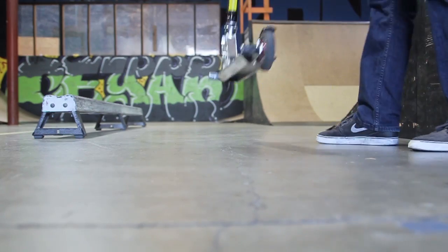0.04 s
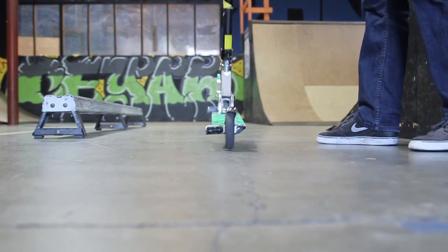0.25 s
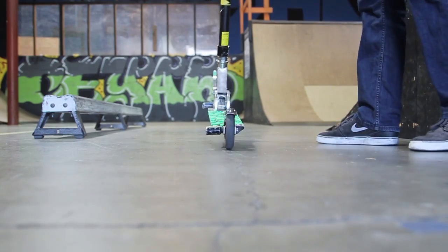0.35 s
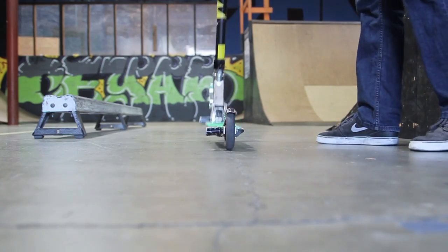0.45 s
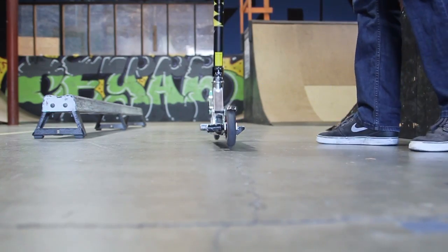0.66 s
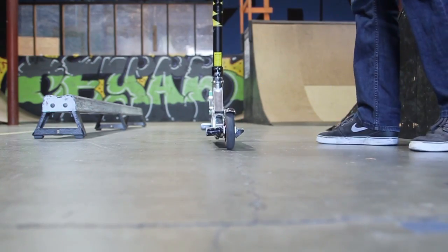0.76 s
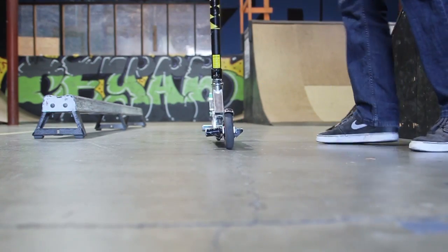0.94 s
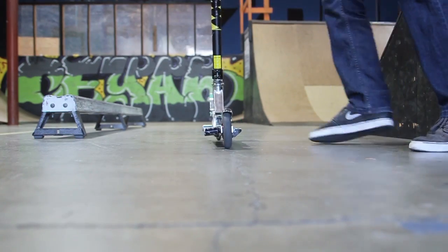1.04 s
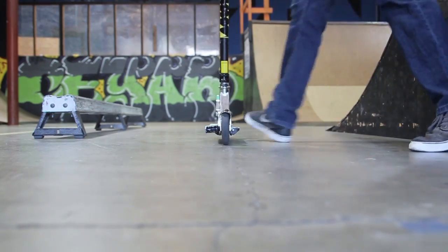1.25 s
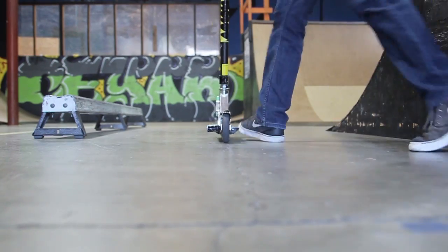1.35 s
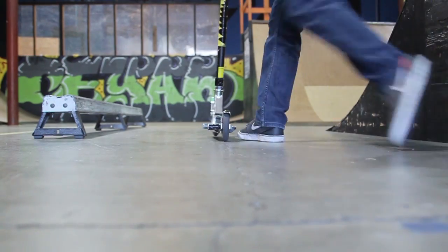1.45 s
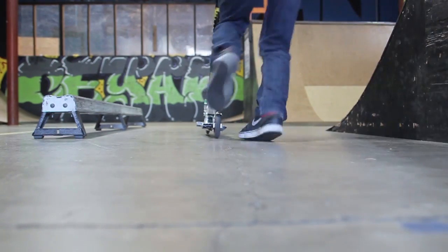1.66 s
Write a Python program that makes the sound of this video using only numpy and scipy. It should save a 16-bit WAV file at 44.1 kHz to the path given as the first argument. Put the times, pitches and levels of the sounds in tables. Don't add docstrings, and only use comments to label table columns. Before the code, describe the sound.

After a faint click, a scooter smacks the floor, its loose metal parts rattling and hollow deck knocking over repeated bounces, then soft grainy wheel roll and small clicks; captured close in a reverberant skate hall.

```python
import sys
import numpy as np
from scipy import signal
from scipy.fft import rfft, irfft
from scipy.io import wavfile
from scipy.ndimage import uniform_filter1d

SR = 44100
rng = np.random.default_rng(int(sys.argv[2]) if len(sys.argv) > 2 else 0)


def amplitude_ratio(level_db):
    exponent = np.asarray(level_db, float) / 20
    return 10 ** exponent


def log_audio(samples):
    frames = np.atleast_2d(samples).T
    limited = np.clip(frames, -1, 1)
    pcm = np.round(limited * 32767).astype(np.int16)
    wavfile.write(sys.argv[1], SR, pcm)


N = 74970

# (time [s], level [dB], length [s], treble [dB])
RATTLES = [(.241, 7, 0.028, 2.5), (0.268, -5.5, 0.04, -3), (0.333, -4.5, 0.023, 13),
           (.552, -1, 0.0096, 0.5), (0.569, -18, 0.015, -4), (0.71, -5, 0.0065, 2), (.726, -14, 0.012, -6),
           (0.75, -6.5, .004, 2), (0.754, -0.5, 0.022, -0.5), (0.822, -21.5, 0.027, -8),
           (0.85, -12.5, 0.0091, -3), (0.909, -6.5, 0.013, 0), (0.963, -16.5, 0.0029, -4),
           (1, -19, 0.012, 3), (1.019, -11, 0.0065, -5), (1.045, -11.5, 0.0059, -3.5),
           (1.083, -29, 0.0059, -24.5), (1.247, -26, 0.0048, -4), (1.263, -36, 0.0067, -15),
           (1.3108, -17.5, 0.0044, -8), (1.317, -17.5, 0.005, -15), (1.326, -18, 0.0092, -7),
           (1.365, -25, 0.0086, -10), (1.49, -29, 0.01, -14), (1.497, -25, 0.006, -15),
           (1.523, -31, 0.022, -7), (1.547, -24.5, 0.0046, -7), (1.5716, -18, 0.0028, -3),
           (1.578, -23, 0.034, -9), (1.6162, -16, 0.0084, -1.5), (1.631, -25.5, 0.023, -16),
           (1.674, -23, 0.021, -10)]
# (frequency [Hz], level [dB])
METAL_MODES = [(545, -54), (1000, -8.5), (1250, 5), (1570, 9.5), (2100, -24), (2690, 2), (3150, 3),
               (3650, 6.5), (4000, 0.5), (4600, 5.5), (5500, -11), (6850, -35), (9000, 0), (14000, 9.5)]
# (time [s], level [dB], pitch [Hz], length [s])
CLANKS = [(.0715, -44, 2400, 0.00088), (0.252, -2.5, 3740, 0.0098), (0.338, -11, 2550, 0.011),
          (0.552, -7.5, 2200, 0.003), (0.577, -13.5, 3900, 0.016), (0.727, -17.5, 2920, 0.0041),
          (0.749, -8, 4650, 0.0091), (0.761, -10.5, 2690, 0.0098), (0.767, -10, 3830, 0.0075),
          (0.829, -16, 2570, 0.0085), (0.912, -16, 2670, 0.013), (0.964, -29, 2650, 0.0083),
          (0.998, -14.5, 3600, 0.0059), (1.02, -19, 2560, 0.0042), (1.046, -24, 3720, 0.007),
          (1.06, -28, 3780, 0.0101), (1.245, -27.5, 3800, 0.005), (1.306, -21.5, 3900, 0.0079),
          (1.334, -28.5, 3130, 0.014), (1.365, -21.5, 2880, 0.011), (1.495, -26, 3750, 0.013),
          (1.525, -27, 3830, 0.0043), (1.543, -25.5, 2340, 0.0071), (1.573, -22, 3220, .003),
          (1.587, -24, 2530, 0.0051), (1.616, -23, 3800, 0.016), (1.678, -27, 3400, .012)]
# (time [s], level [dB], pitch [Hz], ring [s])
TICKS = [(.0135, -25, 980, 0.0079), (.0135, -27, 2200, 0.0016), (.0135, -40, 4200, .001),
         (.017, -28, 1100, .004), (.255, -6, 3580, .012), (.259, -5, 2670, .01), (.264, -9, 3550, 0.011),
         (.341, -2.5, 2550, .016), (.763, -5.5, 2617, .02), (.89, -20, 9500, .006),
         (.554, -7.5, 2120, 0.0098), (.9145, -7.5, 2900, 0.0072), (.9145, -8.5, 1550, 0.0096),
         (.188, -52, 6000, .002), (.405, -8.5, 9000, 0.0058), (.998, -12, 13000, 0.0051),
         (1.002, -9, 5500, 0.0038), (1.0197, -9, 1540, .006), (1.021, -11, 9000, .004),
         (1.022, -18, 14800, .008), (1.035, -21, 9000, 0.012), (1.0445, -8.5, 3660, 0.03),
         (1.048, -18, 12300, .005), (1.0835, -21, 14000, .005), (1.2468, -29, 9000, 0.0056),
         (1.272, -30, 12000, .005), (1.3096, -11.5, 13000, .005), (1.3181, -22, 9000, .004),
         (1.329, -13, 13100, 0.0027), (1.4388, -35, 1500, .004), (1.4678, -26, 1540, 0.0046),
         (1.4912, -32, 9000, .004), (1.4995, -33, 9000, 0.0061), (1.5231, -25, 9000, .006),
         (1.5475, -21, 2320, .006), (1.549, -30, 14000, .006), (1.5725, -34, 3190, .004),
         (1.5728, -23, 13800, 0.0034), (1.581, -22, 8700, .004), (1.591, -26, 14000, .006),
         (1.592, -26, 9500, .004), (1.607, -30, 8800, .003), (1.6154, -12, 9300, .005),
         (1.62, -25, 3860, .008), (1.621, -29, 14500, 0.0052), (1.6758, -25, 8700, .004)]
# (time [s], level [dB], pitch [Hz])
THUMPS = [(.2385, 2, 113.2), (.265, -9.5, 108), (.305, -11, 110), (.345, -12.5, 105), (.438, -20, 163),
          (.55, -4, 110), (.5705, -14, 121), (.704, -8, 118), (.752, -13.5, 120.5), (.831, -12, 104),
          (.855, -18.5, 108), (.906, -20.5, 135), (1.03, -20, 110), (1.2435, -24.5, 100), (1.258, -24, 100),
          (1.307, -22.5, 105), (1.357, -25.5, 93), (1.54, -24, 116), (1.318, -25, 108)]
# (time [s], level [dB], pitch [Hz])
DECK_RINGS = [(.279, -4, 994), (.289, -1.5, 1034), (.308, -10, 1510), (.554, -10.5, 1125),
              (.5875, -5.5, 1050), (.757, -15, 1143), (.77, -6.5, 1150), (.785, -10, 1057), (.79, -8, 1120),
              (.8, -10.5, 1330), (.803, -9, 1090), (.833, -13, 1120), (.914, -30, 1190), (.948, -17, 1050),
              (.968, -17, 1090), (1.02, -24, 1135), (1.054, -15, 1080), (1.077, -13.5, 1274),
              (1.31, -21.5, 1188), (1.342, -23, 1130), (1.363, -16.5, 1103), (1.398, -24, 1000),
              (1.432, -30, 1100), (1.466, -26, 996), (1.547, -24, 1200), (1.685, -23, 1260)]
# (time [s], level [dB], pitch [Hz])
DECK_FLEXES = [
    (.243, -20.5, 394),
    (.338, -21.5, 541),
    (.552, -21, 565),
    (.726, -22, 526),
    (.758, -20.5, 517),
    (.91, -38, 550),
    (1.015, -29.5, 568),
    (1.044, -27.5, 560),
    (1.312, -31, 556),
]
# (time [s], level [dB])
ROLL_LEVEL = [
    (0.949, -50),
    (1.1, -37),
    (1.22, -39),
    (1.33, -32),
    (1.47, -33.5),
    (1.56, -38.5),
    (1.7, -30.5),
]
# (frequency [Hz], tail level [dB], t60 [s])
HALL_TAIL = [(55, -5.5, 0.67), (110, -25.5, 1.94), (170, -10.5, 0.79), (293, -11, 1.8), (680, -16.5, 1.87),
             (920, -9.5, 1.38), (1150, -5.5, 1.21), (1500, -7.5, 1.13), (1900, -15, 1.84),
             (2900, -15, 1.11), (5070, -13, 1.18), (8300, -17.5, 0.99), (14700, -10.5, 0.27)]
# (frequency [Hz], level [dB])
AIR_SPECTRUM = [(25, -17), (60, -6.5), (110, -8), (190, -14.5), (330, -22), (900, -32), (3000, -43.5),
                (11800, -50)]
# (frequency [Hz], gain [dB])
MIC_COLOUR = [(200, 1.03), (280, -3.5), (450, 1.23), (7000, -2.5), (9300, -2.5), (11800, -5), (13800, -2.7),
              (15600, -1)]


def table(rows, hz, column):
    rows = np.array(rows)
    return np.interp(np.log(np.maximum(hz, 1)), np.log(rows[:, 0]), rows[:, column])


def unit(x):
    return x / np.sqrt(np.sum(x ** 4) / np.sum(x ** 2))


def add(out, s, x):
    i = int(s * SR)
    out[i:i + len(x)] += x[:N - i]


def filtered(x, order, hz, kind):
    return signal.lfilter(*signal.butter(order, hz, kind, fs=SR), x)


def rattles():
    rise_s, fall_s, sag_db = 0.00084, 0.0045, -4
    clicks_per_s, click_spread_db = 3000, 2.8
    ring_cycles, detune, mode_spread_db = 70, 0.035, 2.5
    crack_db, crack_hz, sizzle_hz, sizzle_db = 5.5, 1030, 4700, -5.5
    out, t = np.zeros(N), np.arange(SR // 12) / SR
    short = t[:SR // 25]
    hz, db = np.repeat(METAL_MODES, repeats=4, axis=0).T[:, :, None]
    t60 = np.minimum(ring_cycles / hz, 0.04)
    fade = np.exp(-np.log(1000) * short / t60) / np.sqrt(t60)
    for s, level_db, length, treble_db in RATTLES:
        chance, noise = rng.random((2, len(t))), rng.standard_normal(len(t))
        tune, gain = rng.standard_normal((2, len(hz), 1))
        shape = np.clip(t / rise_s, 0, 1) * amplitude_ratio(sag_db * np.minimum(t / length, 1))
        shape = shape * np.exp(-np.maximum(t - length, 0) / fall_s)
        strength = amplitude_ratio(-click_spread_db * np.log(chance[1] + 0.08)) * np.sign(noise)
        clicks = (chance[0] < clicks_per_s / SR) * strength
        tilt = treble_db * np.clip(np.log2(hz / 3000), 0, 2)
        tones = np.sin(2 * np.pi * hz * (1 + detune * tune) * short)
        body = amplitude_ratio(db + tilt + mode_spread_db * gain) * fade * tones
        ring = unit(signal.fftconvolve((clicks + 0.12 * noise) * shape, body.sum(axis=0))[:len(t)])
        grit = noise * (0.5 + uniform_filter1d(np.abs(clicks), size=24) * 3) * shape
        dull = filtered(grit, 1, sizzle_hz, "low")
        bright = dull + amplitude_ratio(sizzle_db + 2 * treble_db) * (grit - dull)
        crack = unit(filtered(bright, 2, crack_hz, "high"))
        add(out, s, amplitude_ratio(level_db) * (ring + amplitude_ratio(crack_db) * crack) / 2)
    return out


def clanks():
    out, t = np.zeros(N), np.arange(SR // 20) / SR
    for s, level_db, hz, length in CLANKS:
        fall_s = min(0.004, length)
        jolt = rng.standard_normal(len(t)) * np.exp(-np.maximum(t - length, 0) / fall_s)
        width = 0.6 if length < 0.002 else 0.06
        add(out, s, amplitude_ratio(level_db) * unit(filtered(jolt, 1, [hz / (1 + width), hz * (1 + width)], "band")))
    return out


def ticks():
    snap_db, snap_s, split = -9, 0.0005, 0.07
    out, t = np.zeros(N), np.arange(SR // 40) / SR
    for s, level_db, hz, ring_s in TICKS:
        lower = np.sin(2 * np.pi * hz * (1 - split) * t)
        upper = np.sin(2 * np.pi * hz * (1 + split) * t)
        ring = np.exp(-4 * t / ring_s) * (lower + upper) / 2
        snap = rng.standard_normal(len(t)) * np.exp(-t / snap_s)
        snap = filtered(snap, 2, [hz / 2, min(2 * hz, 18000)], "band")
        add(out, s, amplitude_ratio(level_db) * (ring + amplitude_ratio(snap_db) * snap))
    return out


def blip(hz, peak_s):
    t = np.arange(int(0.12 * SR)) / SR
    swell = (t / peak_s * np.exp(1 - t / peak_s)) ** 1.75
    return swell * np.sin(2 * np.pi * hz * t)


def knocks(rows, peak_s):
    out = np.zeros(N)
    for s, level_db, hz in rows:
        add(out, s, amplitude_ratio(level_db) * blip(hz, peak_s))
    return out


def wheel_thumps():
    return knocks(THUMPS, peak_s=0.0068)


def deck_rings():
    return knocks(DECK_RINGS, peak_s=0.0027)


def deck_flexes():
    return knocks(DECK_FLEXES, peak_s=0.007)


def rolling():
    grain_db = 3
    s, db = np.array(ROLL_LEVEL).T
    grain = uniform_filter1d(rng.standard_normal(N), size=200) * np.sqrt(200)
    x = filtered(rng.standard_normal(N) * amplitude_ratio(grain_db * grain), 2, (900, 1570), "band")
    return x / x.std() * amplitude_ratio(np.interp(np.arange(N) / SR, s, db, left=-120))


def hall(x):
    build_s, delay_s, diffuse_hz = 0.0062, 0.005, 639.4
    t, tail, haze = np.arange(N) / SR, 0, 0
    f = np.fft.rfftfreq(N, 1 / SR)
    source = rfft(x * np.clip((N / SR - t) * 200, 0, 1))
    late = np.maximum(t - delay_s, 0)
    for hz in 40 * 2 ** np.arange(0, 9, 1 / 3):
        bell = np.exp(-(np.log2(f / hz + 1e-9) / 0.27) ** 2)
        noise = irfft(rfft(rng.standard_normal(N)) * bell, N) / 20
        band = amplitude_ratio(table(HALL_TAIL, hz, column=1)) * noise
        fade = np.exp(-np.log(1000) * t / table(HALL_TAIL, hz, column=2))
        fade = (1 - np.exp(-late / build_s)) * fade
        if hz < diffuse_hz:
            tail = tail + band * fade
        else:
            energy = irfft(source * bell, N) ** 2 / np.mean(bell ** 2)
            haze = haze + band * np.sqrt(np.abs(signal.fftconvolve(energy, fade ** 2)[:N]))
    return signal.fftconvolve(x, tail)[:N] + haze


def air():
    colour = amplitude_ratio(table(AIR_SPECTRUM, np.fft.rfftfreq(N, 1 / SR), column=1))
    x = filtered(irfft(rfft(rng.standard_normal(N)) * colour, N), 2, 25, "high")
    return x / x.std() * amplitude_ratio(-37)


def scene():
    rings, flexes = deck_rings(), deck_flexes()
    blows = rattles() + clanks() + ticks() + wheel_thumps()
    far = hall(blows + amplitude_ratio(-7) * rings + amplitude_ratio(-5) * flexes)
    return (blows + rings + flexes + far + air() + rolling())[None]


def roll_off(x):
    return signal.sosfilt(signal.butter(12, 15850, fs=SR, output="sos"), x)


def record(dry):
    overload, knee, top_hz, pad = 2.5, 7.2, 15900, 2048
    wide = np.pad(dry, [(0, 0), (pad, pad)], "reflect")
    f = np.fft.rfftfreq(wide.shape[1], 1 / SR)
    x = irfft(rfft(wide) * amplitude_ratio(table(MIC_COLOUR, f, column=1)), wide.shape[1])[:, pad:-pad]
    x = x / (1 + np.abs(x / overload) ** knee) ** (1 / knee)
    x = signal.sosfilt(signal.ellip(10, 0.2, 60, top_hz, fs=SR, output="sos"), x)
    return roll_off(np.clip(x, -1, 1))


dry = scene()
out = record(dry)
log_audio(out)
```